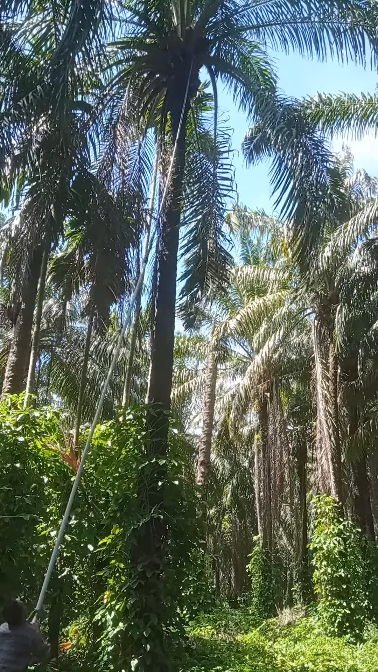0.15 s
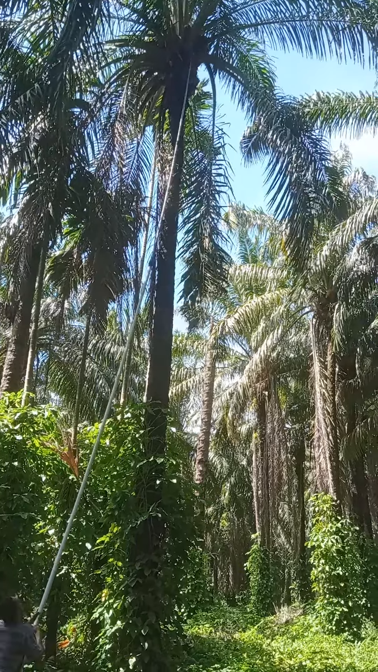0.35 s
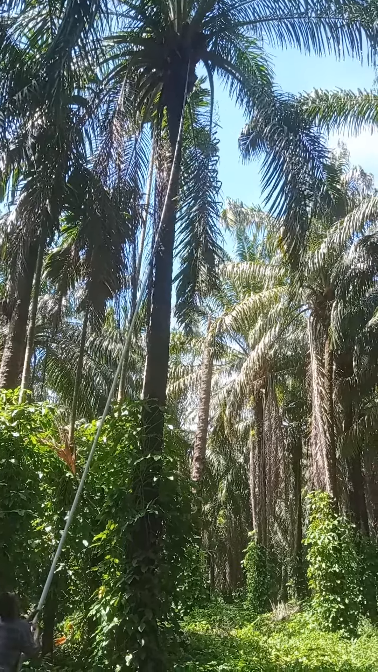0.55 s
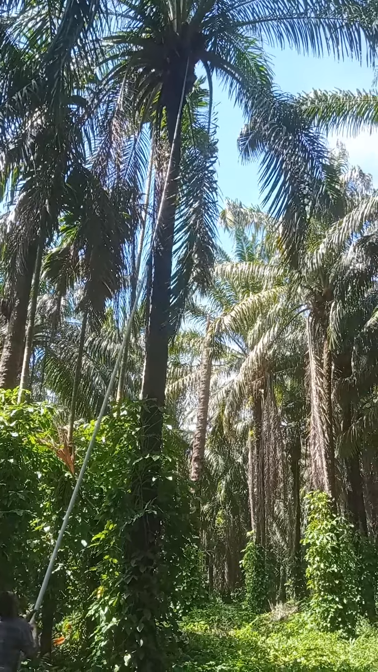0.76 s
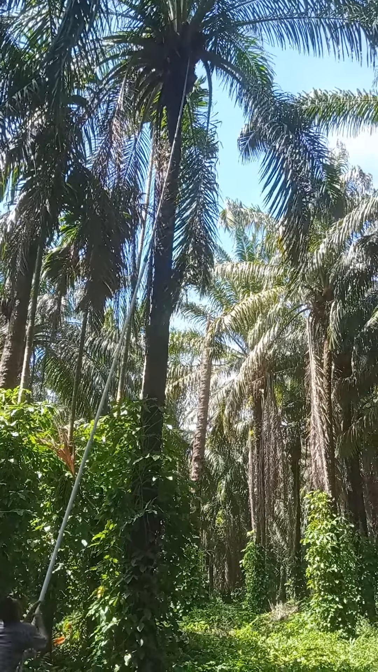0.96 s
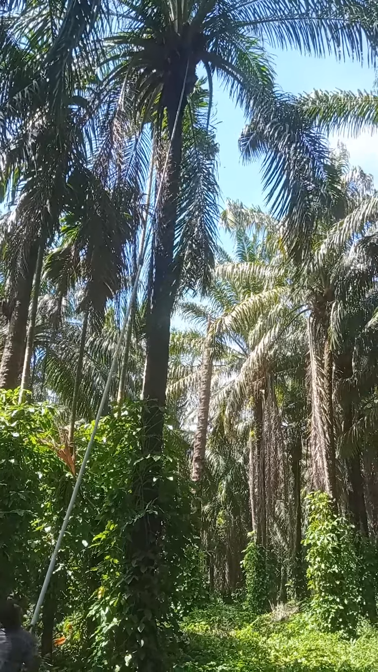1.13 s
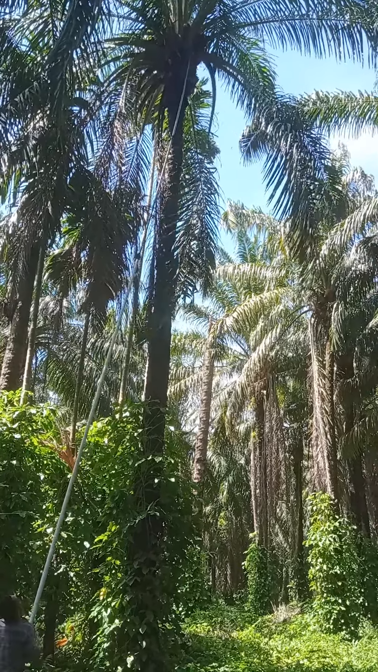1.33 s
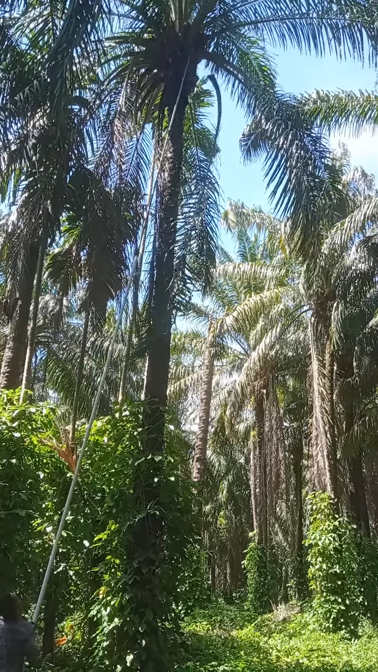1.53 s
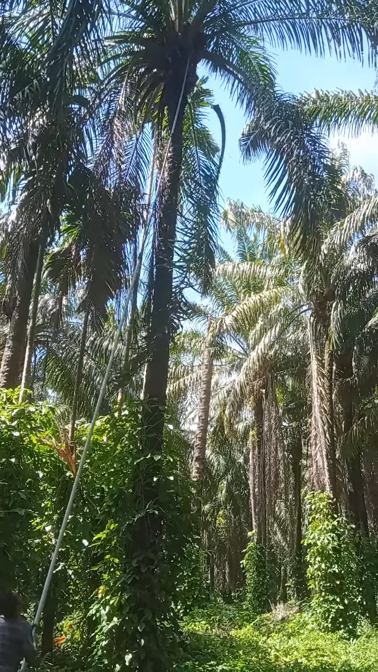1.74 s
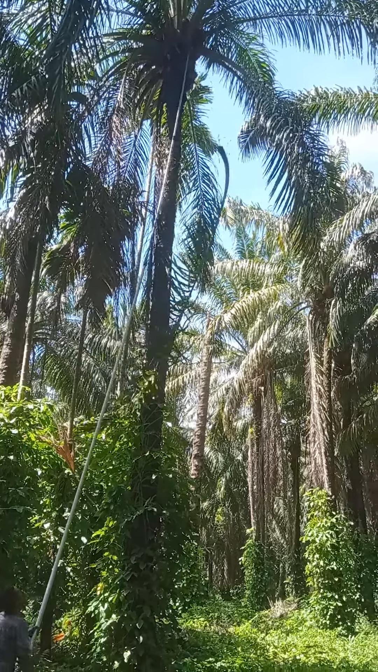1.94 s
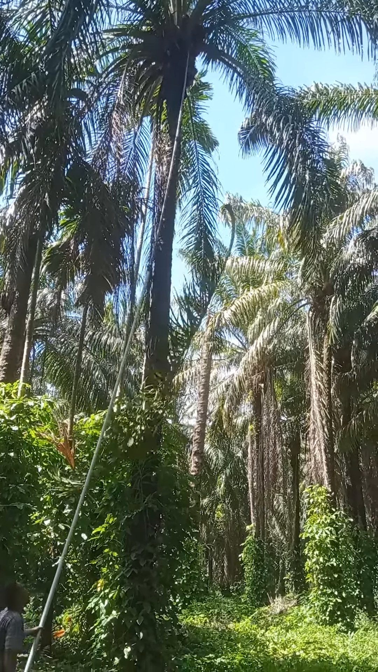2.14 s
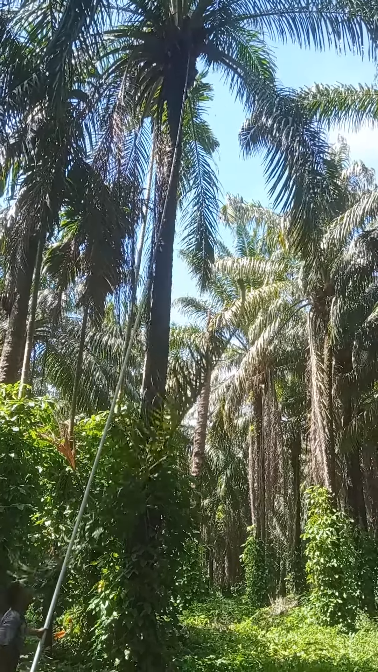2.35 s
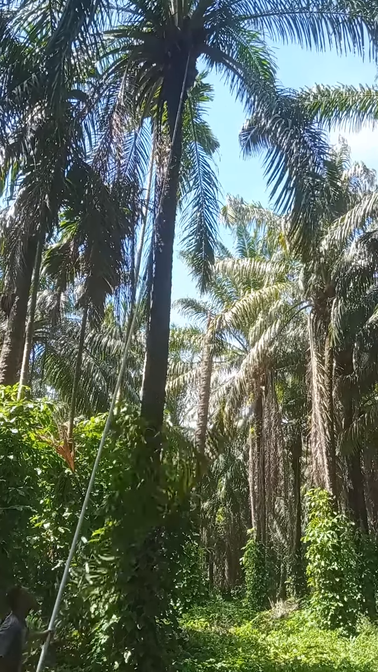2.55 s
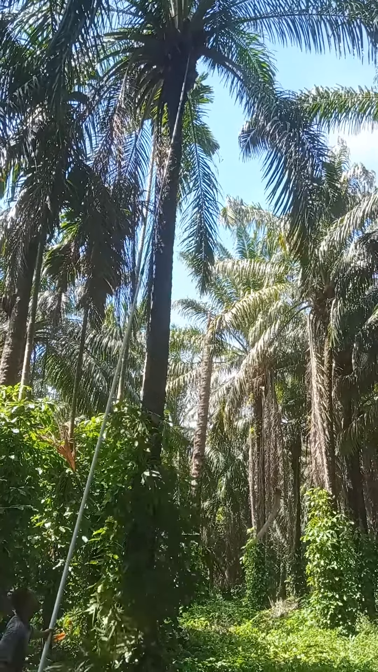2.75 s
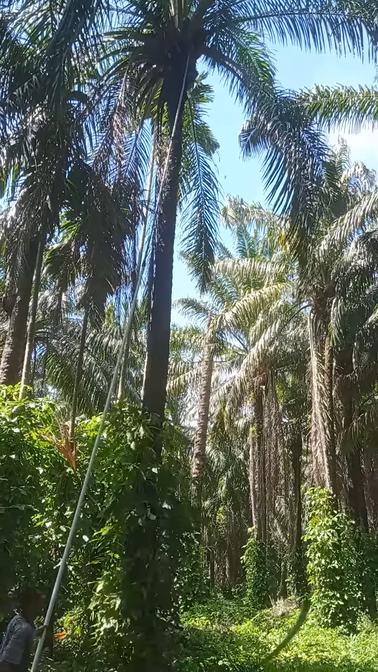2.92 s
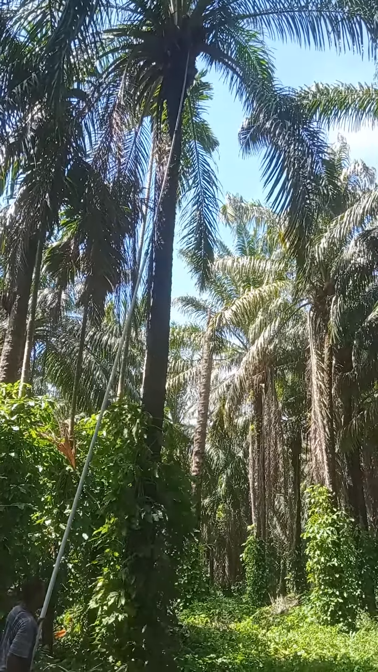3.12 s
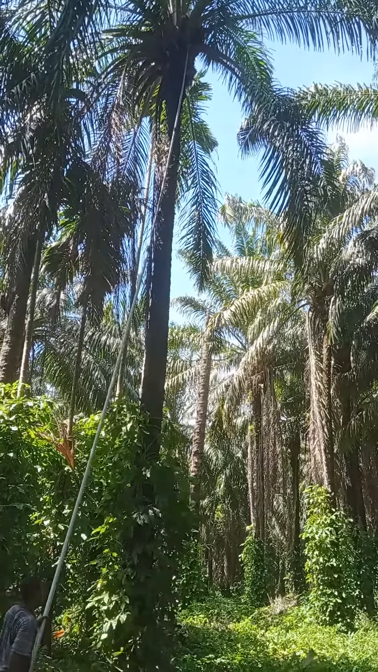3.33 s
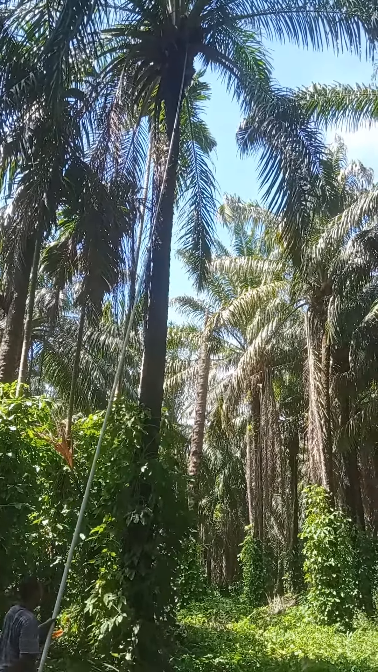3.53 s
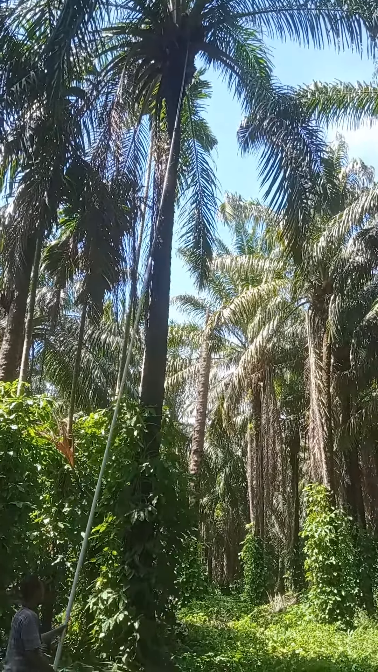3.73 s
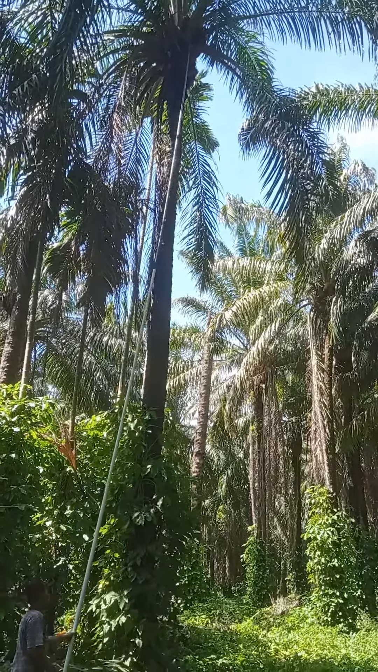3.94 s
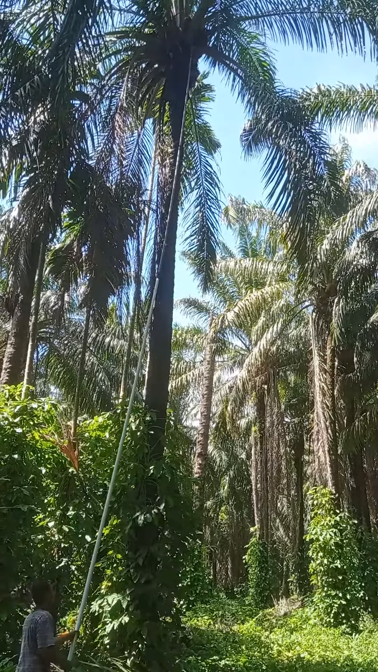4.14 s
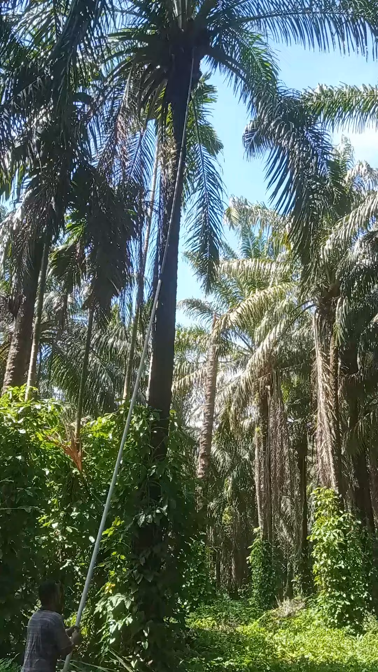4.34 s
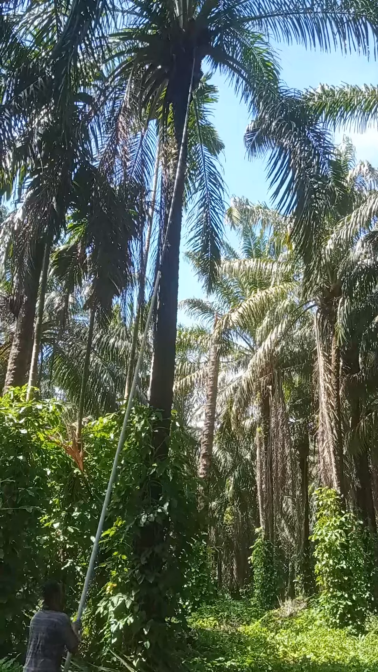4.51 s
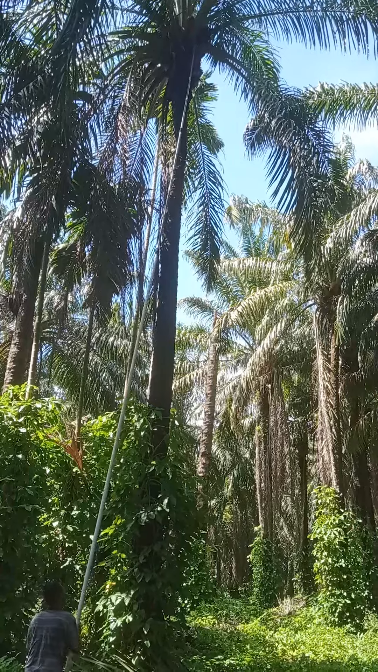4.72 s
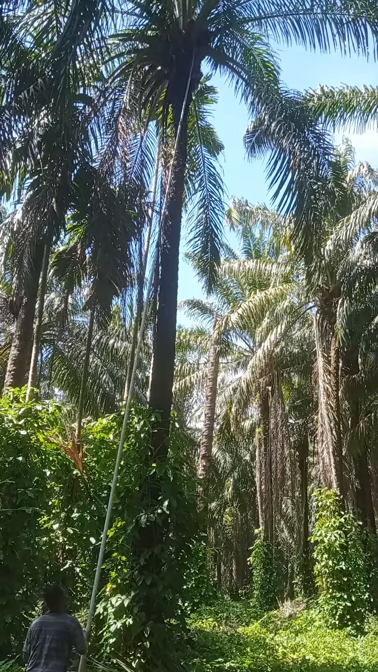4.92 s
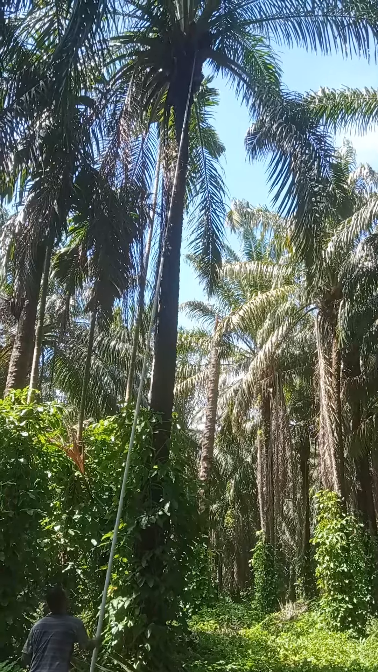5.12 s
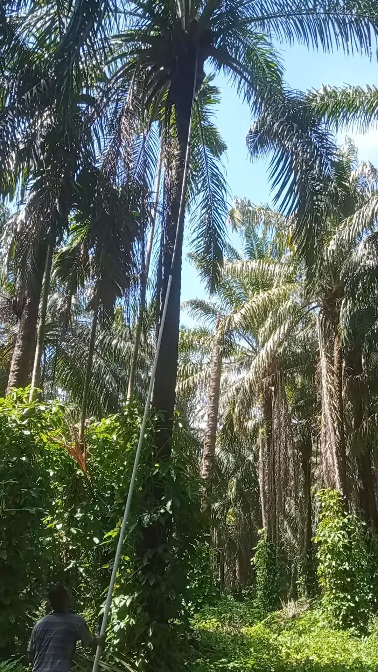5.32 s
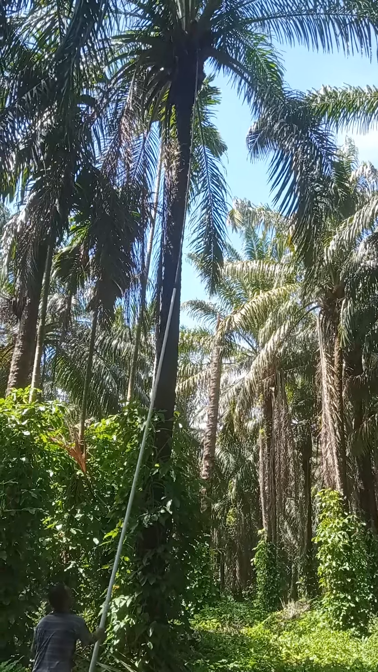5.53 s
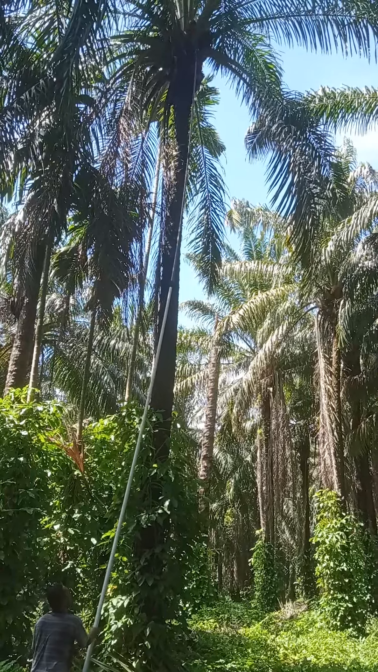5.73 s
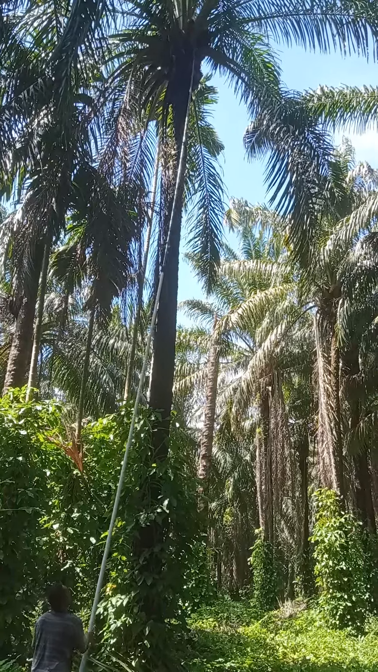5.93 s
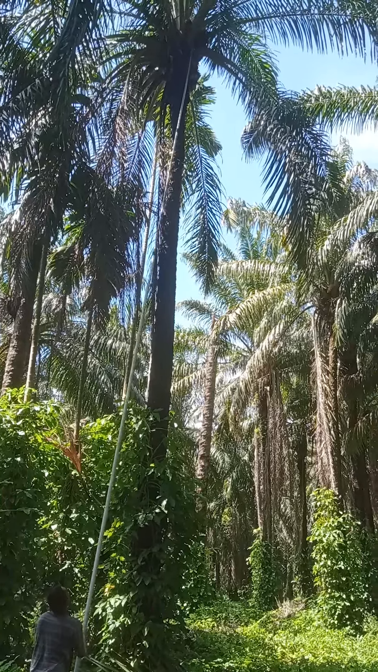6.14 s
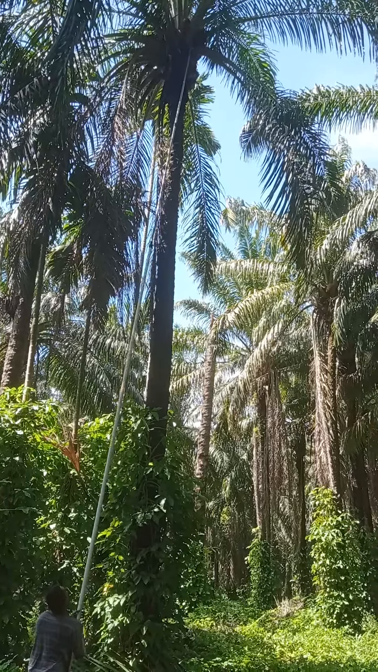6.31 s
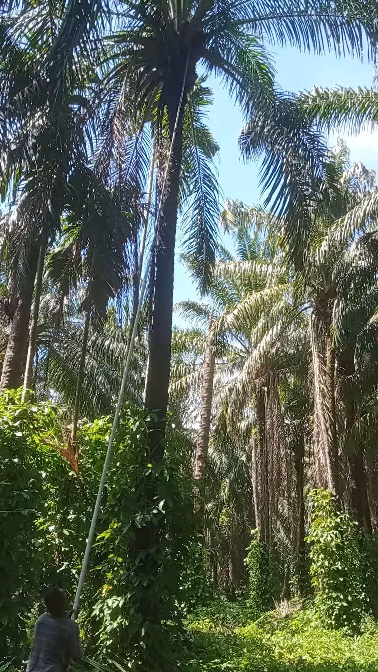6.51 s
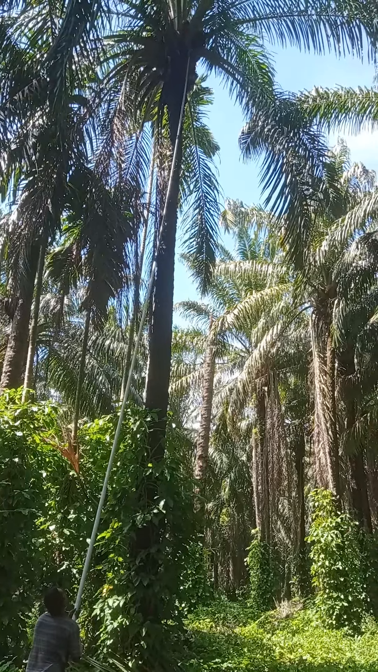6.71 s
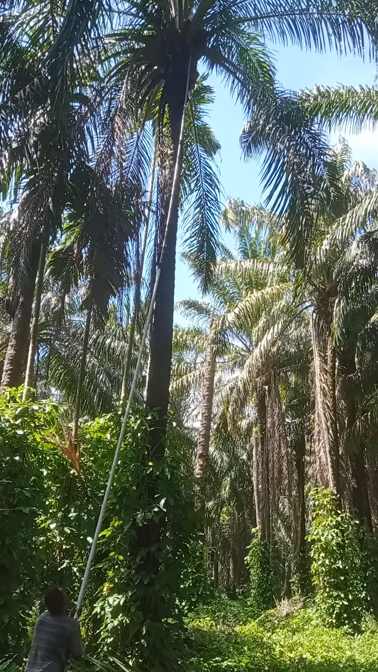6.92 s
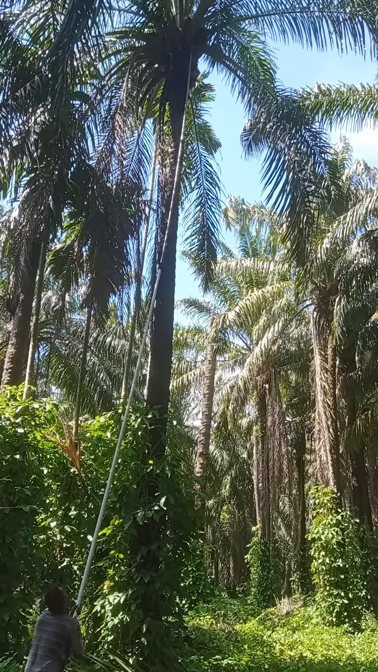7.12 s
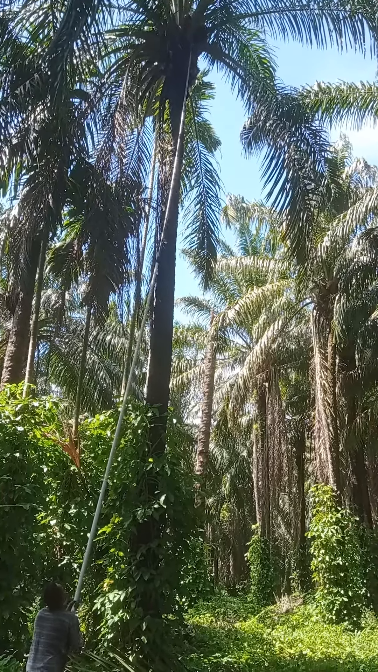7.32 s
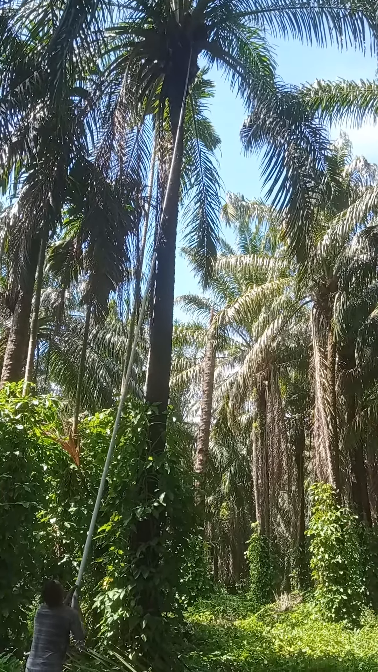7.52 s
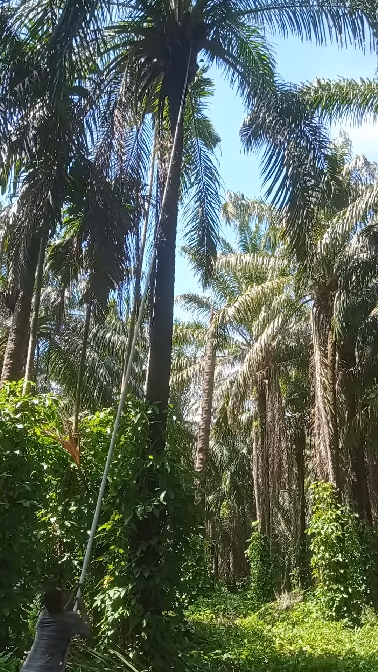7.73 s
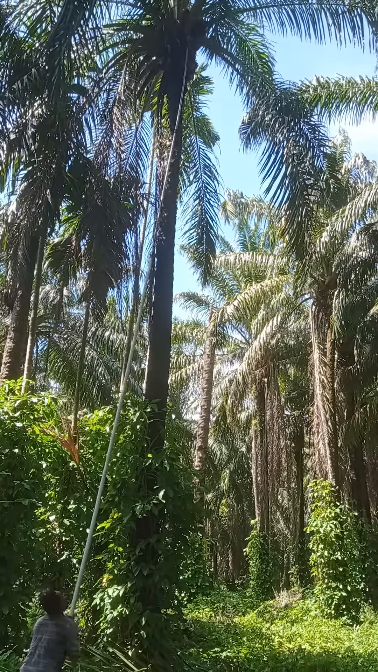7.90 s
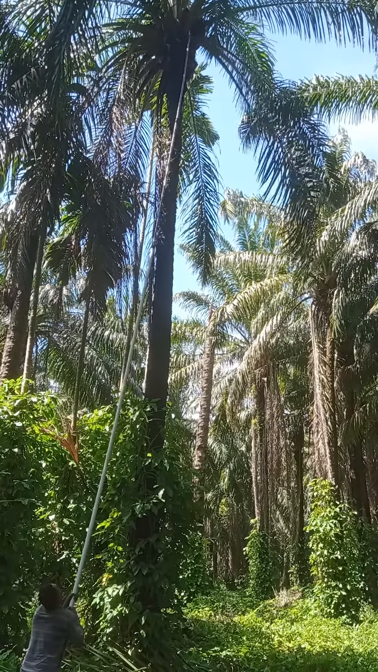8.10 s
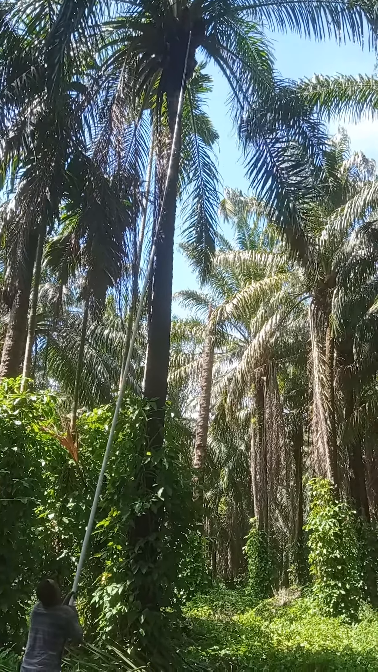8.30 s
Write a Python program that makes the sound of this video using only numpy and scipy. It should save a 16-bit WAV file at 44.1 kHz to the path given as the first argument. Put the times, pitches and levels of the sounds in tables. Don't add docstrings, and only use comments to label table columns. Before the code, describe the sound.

In an open palm grove, a blade on a long metal pole bites at once: from 0.1 to 0.3 s a dense volley of loud woody cracks, tearing fibres and shaken leaves, with metallic ringing near 3 kHz. Smaller snaps and creaks thin out to 0.7 s over a cricket bout. A second crackling pull runs from 1.2 to 1.6 s. The freed frond slides from 1.7 s, its leafy swish swelling from 2.3 s, a knock at 2.4, until a heavy, dull, short thud at 3.15 s. Leaves settle by 4 s. Quiet follows: soft crickets, a thin high buzz, woody pole knocks at 4.84 and 6.7 s, dry ticks, and brief bird whistles between 5.4 and 7.7 s, loudest near 6.9. At 7.9 s the pull resumes, with hard splintering cracks and thrashing leaves continuing to the end, around 8.45 s.

```python
import sys
import numpy as np
from scipy import signal
from scipy.fft import rfft, irfft, next_fast_len
from scipy.io import wavfile
from scipy.ndimage import uniform_filter1d, map_coordinates

SR = 44100
rng = np.random.default_rng(int(sys.argv[2]) if len(sys.argv) > 2 else 0)


def to_wav(s):
    ch = np.atleast_2d(s).T
    pcm = np.round(np.clip(ch, -1, 1) * 32767)
    wavfile.write(sys.argv[1], SR, pcm.astype(np.int16))


def gain_from_db(level_db):
    decades = np.asarray(level_db, float) / 20
    return 10 ** decades


N = 373086
TIME = np.arange(N) / SR


def unit(x):
    return x / np.sqrt(np.mean(x ** 2) + 1e-20)


def along(points, hz):
    f, v = np.transpose(points)
    return np.interp(np.log(hz + 1), np.log(f + 1), v)


def wobble(rate):
    knots = rng.standard_normal(int(N * rate / SR) + 4)
    coarse = map_coordinates(knots, [np.arange(0, N + 32, 32) * rate / SR])
    return np.interp(np.arange(N) / 32, np.arange(len(coarse)), coarse)


def filtered(x, response):
    m = next_fast_len(len(x) + 2048, True)
    return irfft(rfft(x, m) * response(np.fft.rfftfreq(m, 1 / SR)), m)[:len(x)]


def modes(peaks):
    def response(f):
        total = 0
        for k, (centre, width, db) in enumerate(peaks):
            damping = 1j * f * width
            total = total + (-1) ** k * gain_from_db(db) * damping / (centre * centre - f * f + damping)
        return total
    return response


def band(lo_hz, hi_hz):
    def edge(u):
        return 1 / (1 - u * u + 1j * np.sqrt(2) * u)
    return lambda f: edge(f / hi_hz) * edge(-lo_hz / (f + 1e-9))


def grains(per_s, spread_db, smooth):
    size_db = spread_db * np.minimum(rng.exponential(size=N), 4)
    ticks = (rng.random(N) < per_s / SR) * rng.standard_normal(N) * gain_from_db(size_db)
    return unit(ticks) + smooth * rng.standard_normal(N)


def coloured(x, spectrum):
    return unit(filtered(x, lambda hz: gain_from_db(along(spectrum, hz))))


def rustle(spectrum, per_s, spread_db, smooth, patchy_db):
    z = signal.stft(grains(per_s, spread_db, smooth), nperseg=512)[2]
    field = uniform_filter1d(rng.standard_normal(z.shape), 6, 0)
    field = uniform_filter1d(field, 8, 1)
    x = signal.istft(z * gain_from_db(patchy_db * unit(field)), nperseg=512)[1][:N]
    return coloured(x, spectrum)


def bouts(rows):
    t = np.arange(0, N + 64, 64) / SR
    build_db = 35.5
    power = 0
    for s, db, rise, fall in rows:
        drop_db = np.where(t < s, build_db * (s - t) / rise, fall * (t - s))
        power = power + gain_from_db(2 * (db - drop_db))
    return np.interp(TIME, t, np.sqrt(power))


# (frequency [Hz], level [dB per Hz])
AIR_SPECTRUM = [(15, -36), (25, -6.5), (82, 8), (254, -6.5), (670, -4.5), (1310, -31), (3110, -7.5),
                (4660, -13), (5340, -38.5), (6100, -34), (9400, -22.5), (12000, -34.5), (15700, -38.5)]


def air():
    return gain_from_db(-69.5) * rustle(AIR_SPECTRUM, per_s=3600, spread_db=4.0, smooth=4.6, patchy_db=-0.5)


# (start [s], end [s], level [dB])
CRICKET_BOUTS = [
    (0.605, 1.183, -68.5),
    (4.016, 4.795, -71.5),
    (5.064, 5.103, -73),
    (5.13, 5.165, -68.5),
    (5.32, 6.1, -72.5),
    (6.31, 6.345, -73.5),
    (6.474, 7.25, -71),
    (7.433, 7.945, -70),
]


def crickets():
    first_hz, settled_hz, far_db = 4460, 4650, -84.5
    uneven = wobble(40)
    wing = modes([(4780, 220, 0)])
    blur = unit(filtered(rng.standard_normal(N), lambda hz: wing(hz) ** 2))
    out = gain_from_db(far_db) * blur
    for s, end, db in CRICKET_BOUTS:
        t = np.arange(round((end - s) * SR)) / SR
        here = slice(round(s * SR), round(s * SR) + len(t))
        settle = 1 - np.exp(-t / 0.18)
        turn = np.cumsum(18.5 + 3.2 * settle) / SR % 1 * 3
        strength = np.where(turn < 2, 1, .5 * settle) * gain_from_db(1.5 * uneven[here])
        pulse = np.sin(np.pi * turn) ** 2 * strength
        glide = (380 + 250 * settle) * (turn % 1 - .5)
        pitch = first_hz + (settled_hz - first_hz) * settle - glide
        chirp = unit(pulse * np.sin(2 * np.pi * np.cumsum(pitch) / SR)) + 0.6 * settle * blur[here]
        fade = np.minimum(1, (t[::-1] + .01) / (0.18 * (end - s)))
        out[here] += gain_from_db(db) * chirp * fade
    return out


# (start [s], end [s], level [dB])
BUZZ_BOUTS = [
    (3.705, 4.2, -80),
    (4.622, 5.216, -88),
    (5.5, 6.11, -86),
    (6.403, 7.272, -89),
    (7.328, 7.905, -83),
]


def buzzer():
    wing = modes([(7050, 120, -13.5), (6700, 210, -18.5)])
    noise = filtered(rng.standard_normal(N), lambda hz: wing(hz) ** 2)
    buzz = (1 + 0.24 * np.sin(2 * np.pi * 35.0 * TIME)) * noise
    gain = gain_from_db(-92.5)
    for s, end, db in BUZZ_BOUTS:
        gain = gain + gain_from_db(db) * np.clip(np.minimum(TIME - s, end - TIME) / 0.18, 0, 1)
    return unit(buzz) * gain


# (start [s], length [s], start pitch [Hz], end pitch [Hz], level [dB])
BIRD_NOTES = [
    (5.429, 0.048, 3150, 3160, -63.5),
    (5.616, 0.02, 3950, 3260, -61),
    (5.858, 0.046, 3130, 4260, -53),
    (6.519, 0.13, 2500, 2430, -75),
    (6.661, 0.019, 4230, 3280, -54),
    (6.896, 0.036, 3100, 4330, -49),
    (7.386, 0.053, 3130, 3270, -64.5),
    (7.682, 0.014, 3940, 3200, -51.5),
]


def birds():
    out = np.zeros(N)
    for s, length, start_hz, end_hz, db in BIRD_NOTES:
        u = np.arange(round(length * SR)) / (length * SR)
        pitch = start_hz + (end_hz - start_hz) * u
        tone = np.sin(2 * np.pi * np.cumsum(pitch) / SR)
        out[round(s * SR):][:len(u)] += gain_from_db(db) * np.sin(np.pi * u) ** 0.36 * tone
    return out


# (frequency [Hz], t60 [s])
GROVE_T60 = [(200, 0.34), (700, 0.12), (1100, 0.13), (2000, 0.1), (2800, 0.25), (3150, 1), (3600, 0.32),
             (6000, 0.21), (12000, 0.45)]


def grove(x, piece=16000):
    out = np.zeros(N + SR)
    for i in range(0, N, piece):
        hz, t, z = signal.stft(rng.standard_normal(SR // 2), SR, nperseg=256)
        decay = gain_from_db(-60 * t / along(GROVE_T60, hz)[:, None])
        tail = signal.istft(z * decay, SR, nperseg=256)[1]
        wet = signal.fftconvolve(x[i:i + piece], tail / np.linalg.norm(tail))
        out[i + 350:][:len(wet)] += wet
    return out[:N]


# (time [s], brushing level [dB])
DROP_BRUSHING = [
    (1.45, -43),
    (1.7, -42),
    (2.09, -43.5),
    (2.61, -32.5),
    (2.85, -31),
    (3.24, -33),
    (3.34, -44),
    (3.93, -57.5),
    (5.4, -75.5),
]


def descent():
    s, db = np.transpose(DROP_BRUSHING)
    return np.interp(TIME, s, db, -140, -140)


def nearness():
    let_go_s, descent_s = 1.703, 0.236
    return np.clip((TIME - let_go_s) / descent_s, 0, 1)


# (climax [s], level [dB], build-up [s], decay [dB/s], dry fizz relative to level [dB])
CROWN_SHAKES = [
    (0.0, -41, .01, 200, -19.5),
    (0.141, -20.5, 0.067, 79, -18),
    (1.261, -31, 0.19, 94, -12.5),
    (4.619, -53.5, 0.097, 70, -13),
    (4.74, -55, 0.27, 207, -19.5),
    (6.83, -61, 0.59, 63.5, -23.5),
    (7.516, -49.5, 0.11, 101, -19),
    (7.81, -57, 0.12, 103, -17),
    (7.978, -23, 0.098, 61, -17.5),
    (8.275, -33, 0.22, 63, -23),
]


def sway(dry=0, settle_db=-10.5):
    rows = [(s, db + dry * fizz_db, rise, fall) for s, db, rise, fall, fizz_db in CROWN_SHAKES]
    after = [(s, db + settle_db + dry * -4, rise, 28.5) for s, db, rise, fall in rows]
    return bouts(rows + after)


# (frequency [Hz], level [dB per Hz])
SHAKE_SPECTRUM = [(1290, -22), (2200, -8), (2390, -9), (2650, -10), (2950, -4.5), (3120, -1), (3400, -8),
                  (4540, -12), (4900, -15.5), (6170, -42), (7500, -46.5), (9750, -62), (16500, -120)]
SWISH_SPECTRUM = [(710, -30), (1200, -23), (1280, -2.5), (1430, -14.5), (1690, -4.5), (2010, 2),
                  (2340, -1.5), (3060, 4), (3330, 1), (4030, 0.5), (4380, -6), (5310, -14), (7500, -37.5),
                  (9750, -49), (16500, -120)]
FIZZ_SPECTRUM = [(3240, -42), (5500, -8), (7000, -8), (7670, -8.5), (9350, -1), (10900, -9.5), (11600, -11),
                 (13000, -16.5), (14900, -14.5), (15700, -17)]


def leaves():
    breeze_db, near_fizz_db, far_dull_db = -74, -11.5, 8
    flutter = gain_from_db(0.53 * wobble(30))
    shake = rustle(SHAKE_SPECTRUM, per_s=740, spread_db=0.5, smooth=1.4, patchy_db=1.0)
    swish = rustle(SWISH_SPECTRUM, per_s=3000, spread_db=-0.5, smooth=3.9, patchy_db=1.5)
    fizz = rustle(FIZZ_SPECTRUM, per_s=2000, spread_db=2.0, smooth=1.8, patchy_db=1.5)
    fizz = fizz * gain_from_db(1.3 * wobble(8.1))
    crown = gain_from_db(-4.0) * sway() * shake + gain_from_db(1.4) * sway(dry=0.99) * fizz
    brush = np.hypot(gain_from_db(descent()), gain_from_db(breeze_db))
    fizz_gain = gain_from_db(near_fizz_db - far_dull_db * (1 - nearness()))
    return flutter * (crown + brush * (swish + fizz_gain * fizz))


def node(f):
    gap_hz, deep_hz, wide_hz = 860, 40, 143
    reactive = gap_hz ** 2 - f * f
    return (reactive + 1j * f * deep_hz) / (reactive + 1j * f * wide_hz)


# (frequency [Hz], level [dB per Hz])
WHOOSH_SPECTRUM = [(180, -37), (300, -2), (436, -5), (530, -2), (716, 2), (910, 0.5), (1440, -4.5),
                   (1800, 0.5), (2340, -25), (3960, -120)]
RUMBLE_SPECTRUM = [(65, -24.5), (110, -2.5), (254, -2), (403, -16), (458, -9), (500, -15), (650, -47.5),
                   (1100, -120)]
BOOM_SPECTRUM = [(30, -41), (60, -2.5), (90, 0), (130, -13), (250, -42)]
# (climax [s], level [dB], build-up [s], decay [dB/s])
RUMBLE_FLOPS = [
    (3.042, -40, 1.15, 38.5),
    (3.2, -32.5, 0.08, 70),
    (2.3, -56, 0.37, 49.5),
    (2.3, -61, 2.5, 10),
    (1.178, -52.5, .08, 61.5),
    (3.2, -43.5, .01, 402),
    (3.5, -57.5, 0.48, 28),
    (7.58, -66, 0.19, 51),
]
BOOM_FLOPS = [
    (2.7, -60, 0.5, 25.5),
    (3.45, -52.5, 0.99, 44.3),
]


def flop():
    crown = sway(settle_db=-18)
    stop_db = np.clip((TIME - 3.5) * 39, 0, 2)
    fall_db = descent() - 6.5 - 37 * (1 - nearness()) - stop_db
    bulk = gain_from_db(-10) * crown + gain_from_db(fall_db) + gain_from_db(-78)
    rumble = bouts(RUMBLE_FLOPS) + gain_from_db(-30.5) * crown + gain_from_db(-80.5)
    boom = bouts(BOOM_FLOPS) + gain_from_db(-79)

    def lumps(spectrum):
        return coloured(grains(per_s=400, spread_db=1.5, smooth=1.5), spectrum)
    whoosh = rustle(WHOOSH_SPECTRUM, per_s=1300, spread_db=2.5, smooth=2.4, patchy_db=0.84)
    return rumble * lumps(RUMBLE_SPECTRUM) + boom * lumps(BOOM_SPECTRUM) + bulk * filtered(whoosh, node)


# (time [s], level [dB])
LANDING = [
    (3.052, -25),
    (3.1509, 3.5),
]
# (delay [s], frequency [Hz], level [dB], t60 [s])
BUTT_RINGS = [
    (0, 285, 0.5, .03),
    (0, 160, -13, 0.055),
    (0, 620, -6, 0.029),
    (0, 760, -11, .02),
    (.003, 1720, -11, .025),
    (.029, 620, -13.5, .022),
    (.038, 230, -20.5, .03),
    (.072, 235, -20, .03),
    (.112, 250, -23, .03),
]


def thud():
    out, t = np.zeros(N), np.arange(SR // 4) / SR
    onset = 1 - np.exp(-t / .0024)
    for s, level_db in LANDING:
        for delay, hz, db, t60 in BUTT_RINGS:
            ring = gain_from_db(level_db + db - 60 * t / t60) * np.sin(2 * np.pi * hz * t)
            out[round((s + delay) * SR):][:len(t)] += ring * onset
    return out


def tube(f, passes=1):
    cut_on_hz, travel_s, loss_hz = 2978, .004, 15
    lag = np.sqrt((f - 1j * loss_hz) ** 2 - cut_on_hz ** 2) - f
    return np.exp(-2j * np.pi * passes * travel_s * lag)


# (frequency [Hz], width [Hz], level [dB])
BLADE_MODES = [(3101, 410, 6), (4080, 770, 1), (2757, 420, -16), (5450, 1000, -20.5)]


def blade(f):
    return modes(BLADE_MODES)(f) * band(2300, 6500)(f)


# (frequency [Hz], width [Hz], level [dB])
RING_MODES = [(3120, 130, -1.5)]


def blade_ring(x):
    return filtered(x, lambda f: modes(RING_MODES)(f) * tube(f))


# (frequency [Hz], width [Hz], level [dB])
FIBRE_MODES = [(620, 260, 0.5), (1060, 140, 3.5), (428, 260, -12.5), (165.3, 130, -22.5)]
THREAD_MODES = [(1594, 900, 0.5), (2020, 120, 0.5)]
CREAK_MODES = [(590, 270, 0)]
# (climax [s], level [dB], build-up [s], decay [dB/s])
FIBRE_RIPS = [(0.01, -30, 0.087, 402), (0.078, -24.5, 0.0067, 201), (0.165, -17, 0.11, 119),
              (0.41, -28, 0.27, 154), (1.015, -45.5, 0.11, 298), (0.687, -34.5, 0.24, 152),
              (1.47, -34, 0.3, 261), (1.196, -20, 0.016, 38), (1.272, -18.5, 0.125, 175),
              (1.382, -31, 0.024, 144), (1.425, -50, 0.068, 113.5), (4.85, -31, 0.014, 688),
              (4.912, -46, 0.11, 212), (5.362, -44, 0.019, 802.5), (4.28, -54, 0.13, 200),
              (6.7, -40, 0.017, 212), (7.525, -48, 0.088, 199), (7.603, -52, 0.028, 452),
              (7.93, -25, 0.072, 60), (7.985, -17.5, 0.069, 76), (8.2, -25.5, 0.39, 24),
              (8.29, -43, .1, 60)]
# (climax [s], level [dB], build-up [s], decay [dB/s])
STEM_CREAKS = [
    (1.17, -41.5, 0.037, 200),
    (0.404, -33.5, .01, 500),
    (0.42, -32.5, .01, 500),
    (1.2, -47.5, .02, 255),
    (7.95, -31, 0.03, 202),
    (7.165, -62.5, .1, 200),
    (7.355, -58.5, .01, 300.5),
    (7.52, -55.5, 0.23, 250),
    (7.6, -52, .015, 602),
]


def tearing():
    soft_db = -53.5
    sharp_db, sharp_grows = 9, 0.38
    clumps = gain_from_db(2.3 * wobble(50))
    cracks = grains(per_s=900, spread_db=3, smooth=.5)

    def clumped(response):
        return unit(clumps * filtered(cracks, response))
    thick = clumped(lambda f: modes(FIBRE_MODES)(f) * node(f) * band(130, 1300)(f) * band(100, 9000)(f))
    thin = clumped(lambda f: modes(THREAD_MODES)(f) * band(1200, 2500)(f))
    thin += gain_from_db(-11.5) * clumped(lambda f: blade(f) * tube(f))
    creak = clumped(lambda f: modes(CREAK_MODES)(f) ** 2)
    force = bouts(FIBRE_RIPS)
    thick += (creak - thick) / (1 + (force / gain_from_db(soft_db)) ** 2)
    rip = force * (thick + gain_from_db(sharp_db) * force ** sharp_grows * thin)
    return gain_from_db(-8.0) * rip + bouts(STEM_CREAKS) * creak / np.sqrt(clumps)


# (frequency [Hz], width [Hz], level [dB])
STEM_MODES = [(632.4, 78, 0), (741, 70, 5.5), (1050, 51, 2.5), (1500, 96, -4), (1777, 120, -2),
              (1950, 110, 1.5), (2130, 91, -1), (2486, 80, -11)]
# (time [s], peak level [dB],
# strongest ring [Hz], blade part [dB])
FIBRE_SNAPS = [(0.072, -16.5, 1050, -12), (0.085, -19, 1014, -10.5), (0.098, -13, 808, -17.5),
               (0.103, -15.5, 1021, -11), (0.1156, -3, 1840, -9.5), (0.126, -3.5, 688, -6),
               (0.159, -1, 1194, -8), (0.167, -9, 1660, -17.5), (0.174, -10, 1873, -12),
               (0.194, -7, 1030, -12.5), (0.239, -3, 2020, -10), (0.243, -6.5, 1052, -12.5),
               (0.288, -24, 1500, -8), (0.332, -20.5, 1030, -2), (0.367, -23, 970, -9.5),
               (0.386, -24.5, 1900, -18), (0.401, -23.5, 619, -30), (0.419, -21.5, 624, -10),
               (0.463, -21, 1080, -18), (0.557, -37.5, 1270, -16.5), (0.58, -16.5, 1100, -11.5),
               (0.642, -17.5, 1080, -14.5), (0.671, -18, 960, -15), (1.191, -10, 660, -14.5),
               (1.208, -11, 650, -7), (1.217, -5, 990, -14), (1.222, -9, 715, -20),
               (1.236, -18.5, 1030, -1.5), (1.257, -10.5, 1960, -17), (1.264, -6, 1050, -10.5),
               (1.27, -9, 1030, -14.5), (1.279, -17, 1900, -1.5), (1.304, -8, 2060, -7),
               (1.341, -22.5, 2030, -12), (1.37, -10.5, 1010, -8), (1.38, -10.5, 704, -19),
               (1.428, -31, 724, 5), (1.455, -20.5, 1930, -22), (1.493, -10.5, 1090, -11.5),
               (1.545, -7.5, 1350, -11.5), (1.561, -18.5, 720, -15),
               (7.908, -22, 724, -11), (7.94, -32, 754, -19), (7.966, -6.5, 720, -27),
               (7.979, 0, 1550, -7.5), (7.988, -11, 1500, -5), (8.006, -10, 1060, -13),
               (8.025, -4, 673, -9.5), (8.039, -9, 945, -9.5), (8.07, 2.5, 1750, -15),
               (8.096, -17, 1950, -10), (8.171, -6.5, 740, -11.5), (8.239, -17, 684, -7.5),
               (8.262, -13.5, 1540, -11), (8.271, -12, 1960, -16), (8.311, -24, 727, -20),
               (8.336, -6, 1020, -12.5), (8.408, -15, 935, -11.5), (8.448, -22, 1960, -21)]
POLE_KNOCKS = [(1.158, -40, 620, -15), (1.179, -23, 626, -10), (1.705, -32, 1020, -19),
               (2.431, -22.5, 1930, -4), (3.051, -20, 600, -2), (4.044, -39, 603, -9),
               (4.707, -51, 1790, -2), (4.836, -17, 970, -9.5), (4.91, -37.5, 720, -11),
               (5.323, -45, 640, -17), (5.348, -31.5, 720, -15), (5.981, -43, 1834, -24),
               (6.176, -50.5, 624, -28), (6.213, -47, 724, -24), (6.688, -17, 1050, -14),
               (7.801, -47, 606, -17), (7.877, -42, 595, -31)]
# (time [s], peak level [dB], blade part [dB], crackle part [dB])
TWIG_TICKS = [
    (3.78, -38.5, -2, -11),
    (4.18, -55, 10, -21),
    (4.196, -62, 16, -19.5),
    (4.617, -48, 10, -2),
    (6.468, -72.5, 0, 11),
    (6.638, -59, 6, 10.5),
    (7.626, -42, -2.5, 4.5),
]


def snaps():
    out, t, f = np.zeros(N + SR), np.arange(6000) / SR, np.fft.rfftfreq(6000, 1 / SR)
    rows = [(*row, -28.5) for row in FIBRE_SNAPS]
    rows += [(*row, -31) for row in POLE_KNOCKS]
    rows += [(s, db, 2400, bright_db, crackle_db) for s, db, bright_db, crackle_db in TWIG_TICKS]

    lag = np.exp(-2j * np.pi * .0011 * (2 * np.sqrt(2500 * f) - f))
    bend = band(480, 2600)(f) * band(350, 9000)(f) * lag
    second_pass = gain_from_db(-8.5) * np.exp(-2j * np.pi * f * 0.013) * tube(f, passes=2.2)
    wall = blade(f) * (tube(f) + second_pass)
    fizz = gain_from_db(along(FIZZ_SPECTRUM, f))
    release = 14 * (np.arange(len(t)) == 22)

    def die(t60):
        return gain_from_db(-60 * t / t60)

    def peak(v):
        return v / np.abs(v).max()

    for s, db, ring_hz, bright_db, crackle_db in rows:
        slips = rng.standard_normal((3, len(t))) * np.minimum(t / 0.0017, 1)
        struck = []
        for hz, width, gain_db in STEM_MODES:
            near_db = -4.5 * abs(np.log2(hz / ring_hz))
            struck.append((hz, 1.6 * width, gain_db + near_db + rng.normal(0, 1.5)))
        low_force = release + slips[0] * (.8 * die(.015) + .12 * die(0.13))
        high_force = 0.47 * release + slips[1] * (0.76 * die(0.013) + 0.37 * die(0.041))
        dry_force = slips[2] * np.minimum(t / 0.0038, 1) * die(0.044)
        low = peak(irfft(modes(struck)(f) * bend * rfft(low_force)))
        high = peak(irfft(wall * rfft(high_force)))
        crackle = peak(irfft(fizz * rfft(dry_force)))
        blow = low + gain_from_db(bright_db) * high + gain_from_db(crackle_db) * crackle
        out[round(s * SR):][:len(t)] += gain_from_db(db - 3.0) * blow

    def path(f):
        soil = 0.45 * np.exp(-2j * np.pi * f * 0.0033) / (1 + 1j * f / 2200)
        return node(f) * (1 + soil)
    return filtered(out[:N], path)


def scene():
    song, lumps, landing, rips, cuts = birds(), flop(), thud(), tearing(), snaps()
    ring = blade_ring(cuts + rips)
    echo = grove(gain_from_db(-4.5) * cuts + gain_from_db(4.5) * ring + gain_from_db(-19) * landing + gain_from_db(-5.5) * song)
    far = air() + crickets() + buzzer() + song
    return (far + echo + leaves() + lumps + landing + rips + cuts)[None]


def band_limit(x):
    return signal.sosfilt(signal.butter(12, 15830, fs=SR, output="sos"), x)


def record(dry):
    limited = dry[0] / (1 + np.abs(dry[0]) ** 6) ** (1 / 6)
    mix = filtered(limited, band(72, 19000))
    return band_limit(mix[None])


dry = scene()
out = record(dry)
to_wav(out)
```